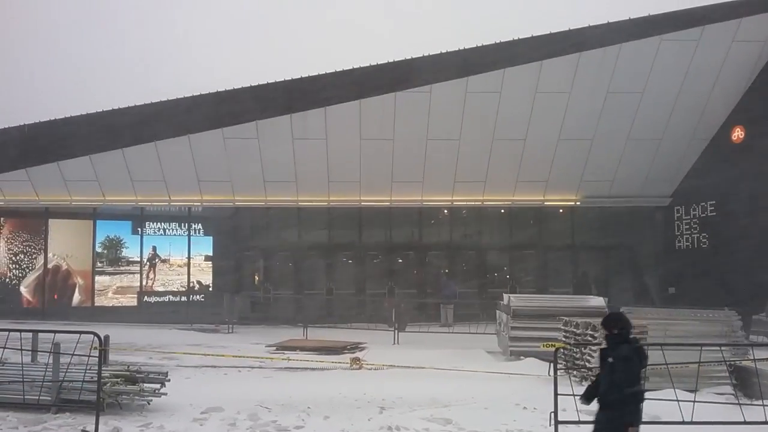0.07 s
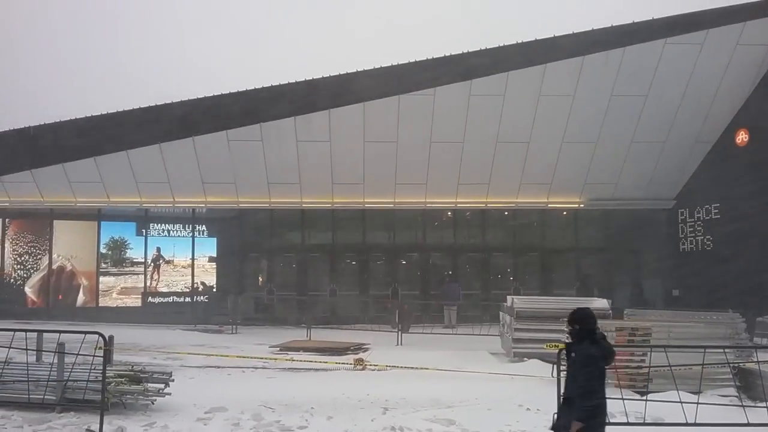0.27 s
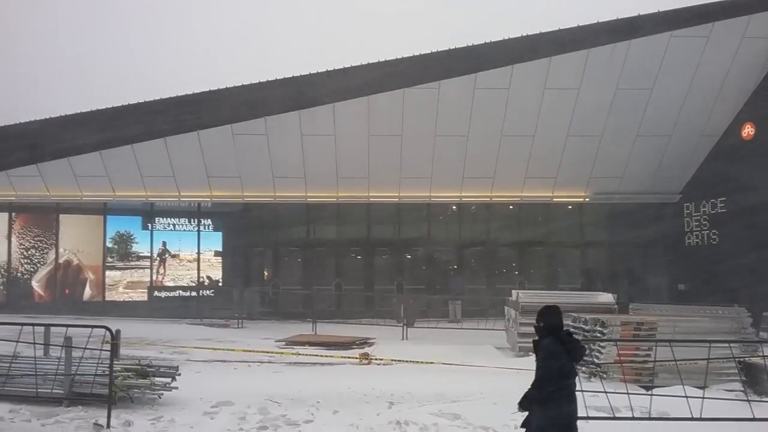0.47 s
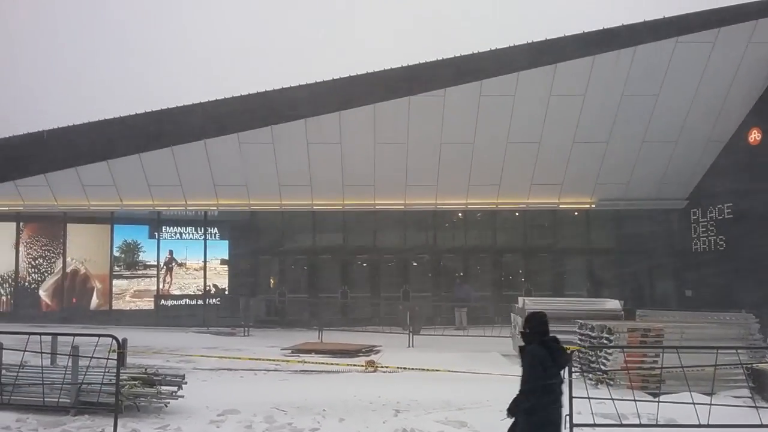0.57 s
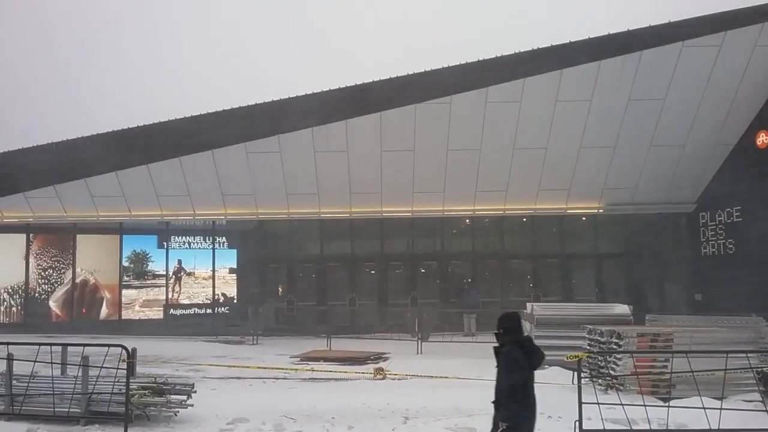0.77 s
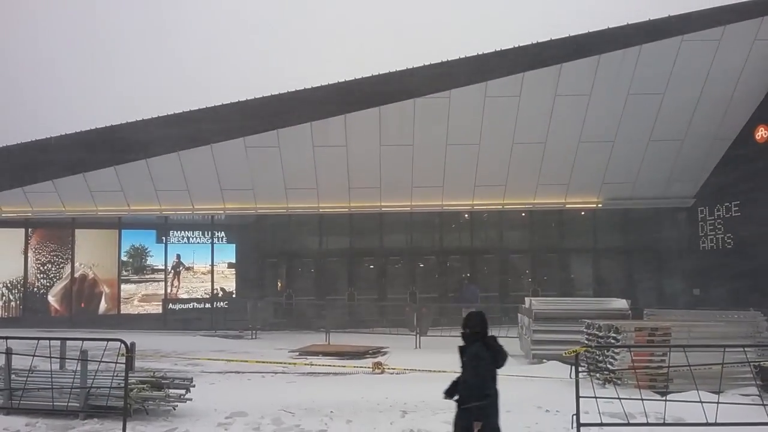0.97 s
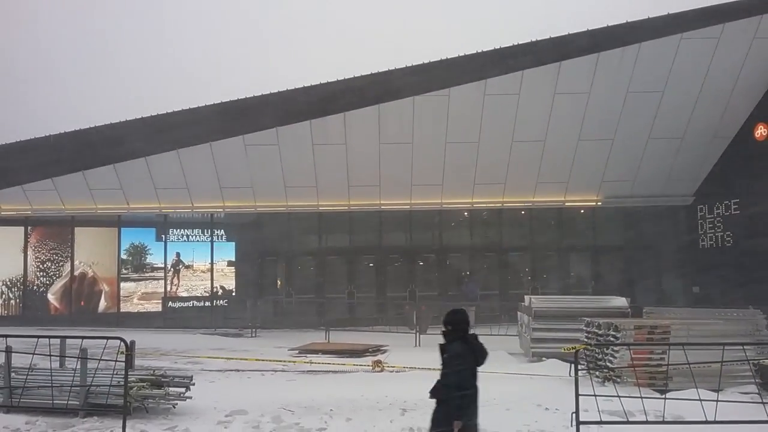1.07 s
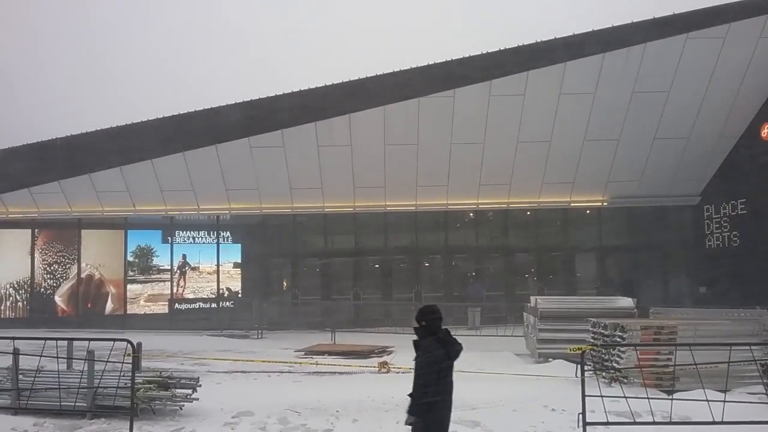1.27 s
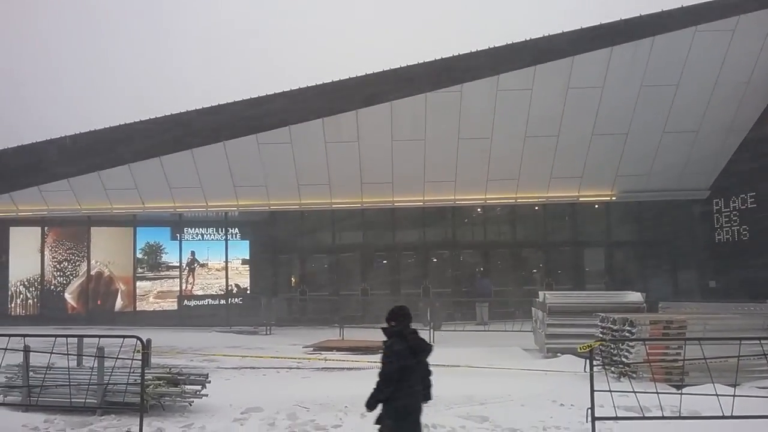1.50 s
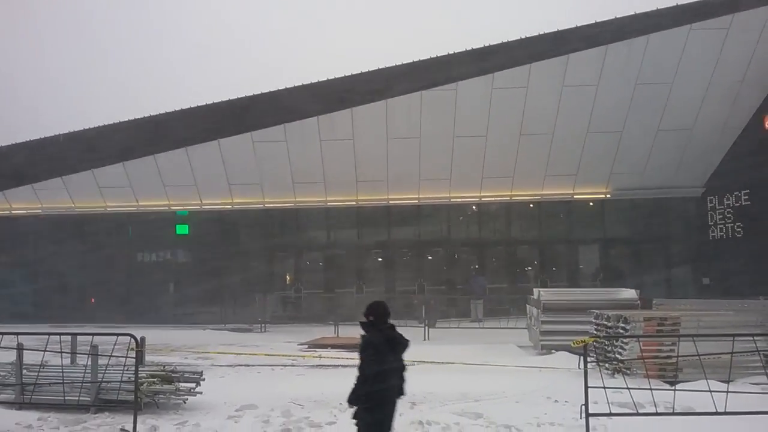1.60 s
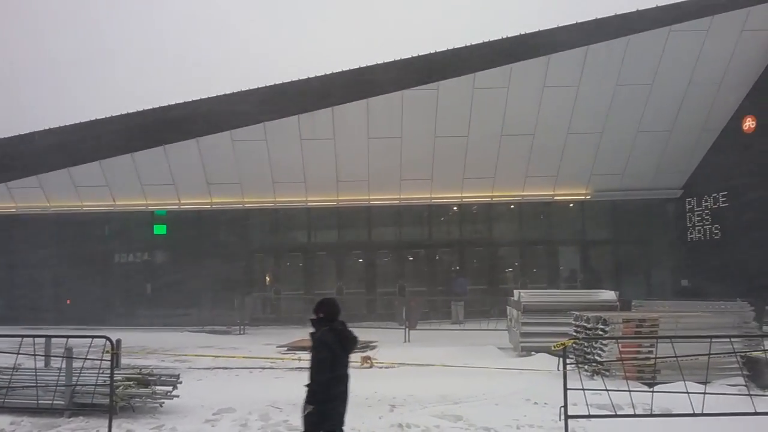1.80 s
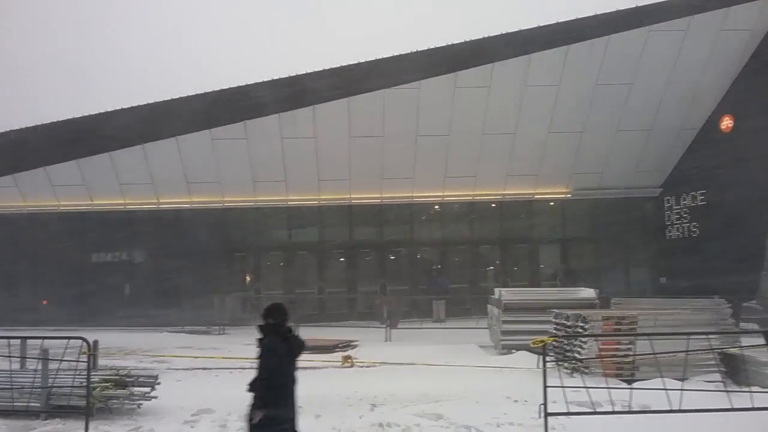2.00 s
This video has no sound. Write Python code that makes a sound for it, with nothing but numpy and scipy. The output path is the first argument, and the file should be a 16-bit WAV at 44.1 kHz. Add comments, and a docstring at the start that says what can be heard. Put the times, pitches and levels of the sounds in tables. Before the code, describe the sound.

Wind rumbles and thuds against a microphone outdoors, rasping as the gust peaks.

```python
"""Winter wind on a microphone

Gusts cross a snowy square and buffet a bare phone microphone. Big swirls of air (eddies) rumble,
and faster air adds a fluttering rush. Small eddies sputter and thud at the microphone's opening,
merging into a tearing rasp at the height of a gust. A few snow grains tick on the case over a
faint hiss. The recorder holds down the loudest peaks and dulls the highest treble."""
import sys
import numpy as np
from scipy import signal
from scipy.fft import rfft, irfft
from scipy.io import wavfile
from scipy.ndimage import uniform_filter1d, minimum_filter1d

SR = 44100
rng = np.random.default_rng(int(sys.argv[2]) if len(sys.argv) > 2 else 0)


def materialize(psi):
    """Save the field psi as 16-bit PCM at rate SR to the path in sys.argv[1].

    A 1-D psi becomes a single channel; in a 2-D psi each row is a channel.
    """
    bounded = np.clip(np.atleast_2d(psi).T, -1, 1)
    quanta = np.round(bounded * 32767).astype(np.int16)
    wavfile.write(sys.argv[1], SR, quanta)


N = 90228

# How loud the low rumble is over time: time_s, level_db
RUMBLE_LOUDNESS = [(0, -16), (.055, -17), (.085, -23), (.17, -26), (.28, -20), (.36, -24), (.48, -17.5),
                   (.55, -20), (.625, -26.5), (.68, -17.5), (.72, -21.5), (.76, -22), (.82, -21.5),
                   (.88, -15.5), (.92, -22.5), (.985, -9.5), (1.02, -24), (1.06, -14.5), (1.1, -20.5),
                   (1.18, -22.5), (1.225, -14), (1.275, -34), (1.315, -15), (1.45, -13), (1.62, -15.5),
                   (1.67, -16), (1.85, -17), (1.89, -13.5), (1.955, -17.5), (2.05, -19)]
# How strongly air rushes over the opening: time_s, strength_db
WIND_STRENGTH = [(0, -17.5), (.06, -24.5), (.085, -38.5), (.11, -25), (.31, -22.5), (.36, -30), (.39, -17),
                 (.44, -32.5), (.475, -21), (.55, -23.5), (.61, -35.5), (.69, -22.5), (.74, -27.5),
                 (.76, -21), (.82, -32.5), (.88, -21), (.915, -24), (.97, -17.5), (1.09, -26), (1.12, -16),
                 (1.15, -27.5), (1.275, -27.5), (1.31, -19.5), (1.36, -23.5), (1.52, -18), (1.64, -19.5),
                 (1.84, -22), (1.93, -24), (2, -19.5), (2.05, -26)]
# Eddies that slap the opening: time_s, body_db, crack_db
SLAP_HITS = [(0.0234, -20.0, -42.0), (0.0357, -25.0, -55.0), (0.0655, -25.0, -57.0), (0.1076, -30.0, -75.0),
             (0.1663, -22.0, -44.0), (0.2193, -22.0, -54.0), (0.2412, -22.0, -48.0), (0.3203, -23.0, -54.0),
             (0.3897, -22.0, -43.0), (0.4065, -20.0, -33.0), (0.4974, -18.0, -38.0), (0.5287, -21.0, -46.0),
             (0.9344, -22.0, -47.0), (0.9644, -20.0, -37.0), (1.0, -21.0, -49.0), (1.0395, -21.0, -55.0),
             (1.0791, -25.0, -60.0), (1.2251, -29.0, -80.0), (1.2916, -23.0, -67.0), (1.2973, -23.0, -59.0),
             (1.3225, -22.0, -57.0), (1.3845, -18.0, -47.0), (1.3939, -24.0, -46.0), (1.4041, -18.0, -38.0),
             (1.425, -20.0, -47.0), (1.4654, -14.0, -32.0), (1.4696, -17.0, -24.0), (1.4984, -21.0, -43.0),
             (1.5213, -18.0, -25.0), (1.5636, -12.0, -29.0), (1.6595, -27.0, -41.0), (1.6685, -19.0, -45.0),
             (1.7061, -16.0, -27.0), (1.7577, -14.0, -32.0), (1.77, -16.0, -34.0), (1.7995, -19.0, -33.0),
             (1.8294, -16.0, -35.0), (1.8397, -13.0, -36.0), (1.8561, -21.0, -36.0), (1.8839, -20.0, -39.0),
             (1.9057, -24.0, -63.0), (1.9514, -28.0, -59.0), (1.9959, -23.0, -53.0)]
# Snow grains landing on the case: time_s, level_db
SNOW_HITS = [(0.068, -43), (0.55, -40), (.765, -36), (1.184, -48), (1.571, -16)]
# Stretches where the air rasps without a pause: start_s, end_s, level_db
TEAR_SPANS = [(0.384, 0.422, -30), (0.471, 0.488, -25), (0.945, 1.005, -27.5), (1.437, 1.629, -23.5),
              (1.702, 1.72, -19.5), (1.747, 1.803, -23.5), (1.856, 1.879, -18)]

# A tone table says how strong the low and high pitches of a sound are, compared with each other.
# Deep rumble of big eddies: pitch_hz, level_db
RUMBLE_TONE = [(20, -54), (35, -33), (52, -11.5), (75, -4), (120, -1), (170, -4), (240, -7), (340, -12.5),
               (600, -28), (1500, -90)]
# Rush of faster air: pitch_hz, level_db
RUSH_TONE = [(130, -5), (230, 3.5), (330, 8.5), (500, -1), (800, -6), (1300, -27.5), (2200, -45),
             (3500, -60.5), (6600, -66.5), (8500, -85.5)]
# Mid-pitched rasp of small eddies: pitch_hz, level_db
RASP_TONE = [(70, -2.5), (250, 6), (500, 9.5), (1200, 10.5), (2000, 1.5), (3000, -13), (4000, -35.5),
             (7000, -71.5)]
# Hiss of blowing snow: pitch_hz, level_db
HISS_TONE = [(1500, 6.5), (3000, 3.5), (4500, 2), (6500, 7.5), (7200, -1.5), (8500, -13.5), (15500, -12)]
# Bright crack of a fast eddy: pitch_hz, level_db
CRACK_TONE = [(1000, -9.5), (2300, 11.5), (3600, 4.5), (4800, -4), (6500, -6), (7200, -18.5), (8800, -45.5)]
# Tick of one snow grain: pitch_hz, level_db
TICK_TONE = [(800, -28), (3000, 4), (5000, -5.5), (6700, -7.5), (8000, -25.5), (10000, -29), (15500, -24)]

USUAL_WIND_DB = -21  # wind above this strength sounds brighter, wind below it duller
RASP_RISE_S, RASP_FALL_S = 0.0014, 0.00095
TIME_S = np.arange(N) / SR
PITCH_HZ = np.maximum(np.fft.rfftfreq(N, 1 / SR), 1)


def gain(db):
    """Turn decibels into a number to multiply a sound by."""
    return 10 ** (np.asarray(db) / 20)


def curve(rows):
    """Join rows of time_s, value with straight lines."""
    return np.interp(TIME_S, *np.array(rows).T)


def tone_gains(tone):
    """Turn a tone table into a gain for every pitch."""
    hz, db = np.array(tone).T
    return gain(np.interp(np.log(PITCH_HZ), np.log(hz), db))


def noise(tone):
    """Noise with the given tone and a typical size of 1."""
    shaped = irfft(rfft(rng.standard_normal(N)) * tone_gains(tone), N)
    return shaped / shaped.std()


def steady(sound, span_s):
    """Hold a sound's level near 1, ironing out swells slower than span_s."""
    span = max(int(span_s * SR), 2)
    power = uniform_filter1d(uniform_filter1d(sound * sound, span), span)
    return sound / np.sqrt(power + 1e-12)


def wander(rate_hz):
    """A smooth random wobble of typical size 1 that changes about rate_hz times a second."""
    span = max(int(SR / rate_hz), 2)
    wobble = uniform_filter1d(rng.standard_normal(N), span, mode="wrap")
    wobble = uniform_filter1d(wobble, span // 2, mode="wrap")
    return wobble / wobble.std()


def flutter(rate_hz):
    """A random wobble kept gently between -2 and 2."""
    return 2 * np.tanh(wander(rate_hz) / 2)


def bursts(times_s, levels_db, rise_s, fall_s):
    """A loudness outline that swells quickly up to each given time, then dies away."""
    outline = np.zeros(N)
    for time_s, db in zip(times_s, levels_db):
        peak = int(time_s * SR)
        near = slice(max(peak - SR // 20, 0), peak + SR // 20)
        lag_s = TIME_S[near] - time_s
        outline[near] += gain(db) * np.exp(np.minimum(lag_s / rise_s, -lag_s / fall_s))
    return uniform_filter1d(uniform_filter1d(outline, size=19), size=19)


def push_pull(samples, sizes, widths_s):
    """Each passing eddy pushes and pulls the air once, around its own sample."""
    lag = np.arange(-SR // 200, SR // 200)
    widths_away = lag / SR / widths_s[:, None]
    waves = sizes[:, None] * widths_away * np.exp(-widths_away ** 2 / 2)
    places = np.clip(samples[:, None] + lag, 0, N - 1)
    return np.bincount(places.ravel(), waves.ravel(), N)


def snap(pulses, tone):
    """Turn each pulse into a sudden jump in air pressure with the given tone."""
    # Folding the cepstrum (a transform of the tone) packs the energy at the start of the jump.
    cepstrum = irfft(np.log(tone_gains(tone)), N)
    cepstrum[1:N // 2] *= 2
    cepstrum[N // 2 + 1:] = 0
    jump = irfft(np.exp(rfft(cepstrum)), N)[:SR // 10]
    return signal.fftconvolve(pulses, jump / np.linalg.norm(jump))[:N]


def rumble():
    """Big eddies push on the thin skin inside the microphone."""
    return steady(noise(RUMBLE_TONE), span_s=0.051) * gain(curve(RUMBLE_LOUDNESS) + 1.41)


def rush():
    """Churning air flutters at the opening; stronger wind makes it louder and brighter."""
    wind_db = curve(WIND_STRENGTH) - USUAL_WIND_DB
    wobble = 7.5 * flutter(rate_hz=152)
    spectrum = rfft(noise(RUSH_TONE))
    octaves_up = np.clip(np.log2(PITCH_HZ / 250), 0, 4)  # counted from 250 Hz
    sound = np.zeros(N)
    for octave in range(5):
        band = irfft(spectrum * np.maximum(1 - abs(octaves_up - octave), 0), N)
        response = 1.28 + 0.16 * octave  # higher bands react more to the wind
        fluttering = steady(band * gain(wobble * response), span_s=0.032)
        sound += fluttering * band.std() * gain(-19 + wind_db * response)
    return sound


def pops(per_second=190):
    """Countless small eddies pop and sputter; weak ones are round, hard ones short and bright."""
    count = int(per_second * N / SR)
    timing, direction = rng.random((count, 2)).T
    scatter_db = 4.5 * np.clip(rng.standard_normal(count), -2, 2)
    samples = ((np.arange(count) + timing) / count * (N - 1)).astype(int)
    force_db = 0.66 * (curve(WIND_STRENGTH)[samples] - USUAL_WIND_DB) + scatter_db
    force = gain(force_db)
    sizes = np.sign(direction - .5) * force * gain(-22.5)
    popping = push_pull(samples, sizes, widths_s=0.00028 / force ** 0.32)
    sputter = noise(RASP_TONE) * bursts(samples / SR, -36.5 + 2 * force_db, RASP_RISE_S, RASP_FALL_S)
    return popping + sputter


def snow_hiss():
    """Blowing snow makes a faint, slightly wavering hiss."""
    return noise(HISS_TONE) * gain(-66 + 1.5 * wander(rate_hz=25))


def slaps():
    """Fast eddies hit the opening, each with a thud, a pressure jump, a short rasp and a crack."""
    times_s, body_db, crack_db = np.array(SLAP_HITS).T
    samples = (times_s * SR).astype(int)
    direction, width = rng.random((len(times_s), 2)).T
    push = np.sign(direction - .5) * gain(body_db)
    thud = push_pull(samples, push * gain(13), widths_s=0.0005 * 2 ** (width - .5))
    jump = snap(np.bincount(samples, push * gain(15), N), RASP_TONE)
    rasp = steady(noise(RASP_TONE), span_s=0.0015)
    rasp *= bursts(times_s, body_db + 7.5, RASP_RISE_S, RASP_FALL_S)
    crack = steady(noise(CRACK_TONE), span_s=0.0015)
    crack *= bursts(times_s, crack_db + 13.5, rise_s=0.00027, fall_s=0.0015)
    return thud + jump + rasp + crack


def snow_ticks():
    """Single grains of snow tick on the case."""
    times_s, levels_db = np.array(SNOW_HITS).T
    return noise(TICK_TONE) * bursts(times_s, levels_db, rise_s=0.00043, fall_s=0.0021)


def tearing(fade_s=0.01):
    """In the hardest gusts the air rasps without a pause and cracks at the peaks of its flutter."""
    outline = np.zeros(N)
    for start_s, end_s, level_db in TEAR_SPANS:
        inside_s = np.minimum(TIME_S - start_s, end_s - TIME_S)
        outline += gain(level_db) * np.clip(inside_s / fade_s + .5, 0, 1)
    wobble = gain(6.5 * flutter(rate_hz=260))
    rasp = noise(RASP_TONE)
    crack = gain(-21) * wobble * noise(CRACK_TONE)
    return outline * steady(wobble * (rasp + crack), span_s=0.0065)


def scene():
    """Add up the wind and the snow in one channel."""
    wind = rumble() + rush() + pops() + slaps() + tearing()
    return (wind + snow_ticks() + snow_hiss())[None]


def record(dry):
    """The opening rings briefly; the deepest bass, loudest peaks and highest treble are cut back."""
    ring_hz, ring_width_hz = 4100, 260
    low_cut_hz, high_cut_hz = 40, 15800
    limit_db, limit_span_s = -.6, .005
    decay = np.exp(-np.pi * ring_width_hz / SR)
    ring = [1, -2 * decay * np.cos(2 * np.pi * ring_hz / SR), decay * decay]
    sound = signal.lfilter(ring[::-1], ring, dry)  # this pitch lingers without getting louder
    sound = irfft(rfft(sound) / (1 + (low_cut_hz / PITCH_HZ) ** 6), N)
    # Turn the volume down smoothly around each peak that is over the limit.
    span = int(limit_span_s * SR)
    safe_volume = np.minimum(1, gain(limit_db) / (abs(sound) + 1e-9))
    volume = uniform_filter1d(minimum_filter1d(safe_volume, span), span)
    treble_cut = signal.ellip(8, .2, 70, high_cut_hz, fs=SR, output="sos")
    return signal.sosfilt(treble_cut, sound * volume)


dry = scene()
out = record(dry)
materialize(out)
```